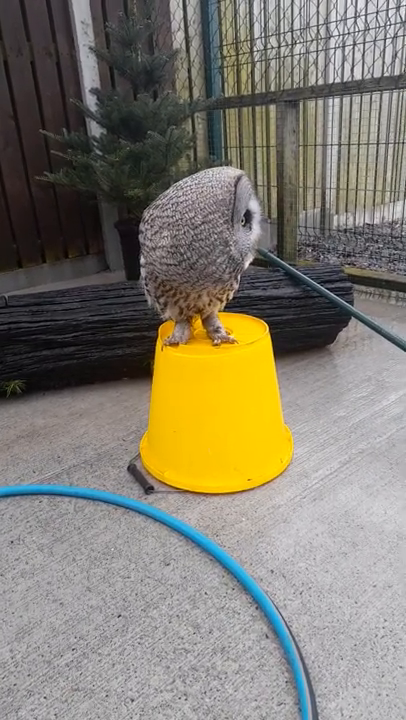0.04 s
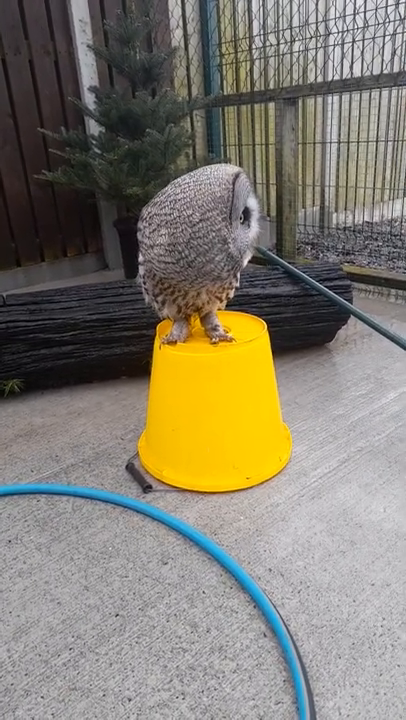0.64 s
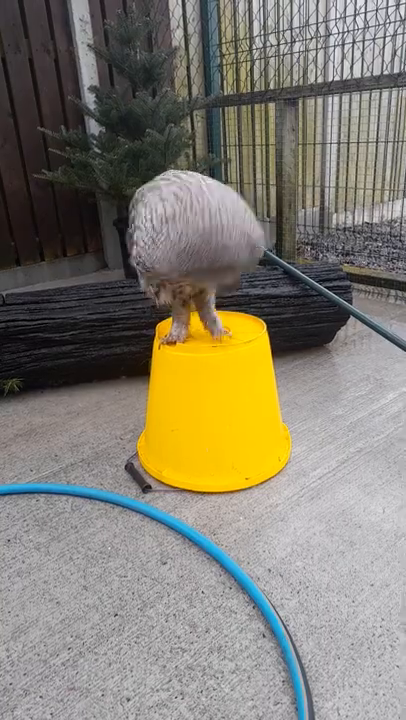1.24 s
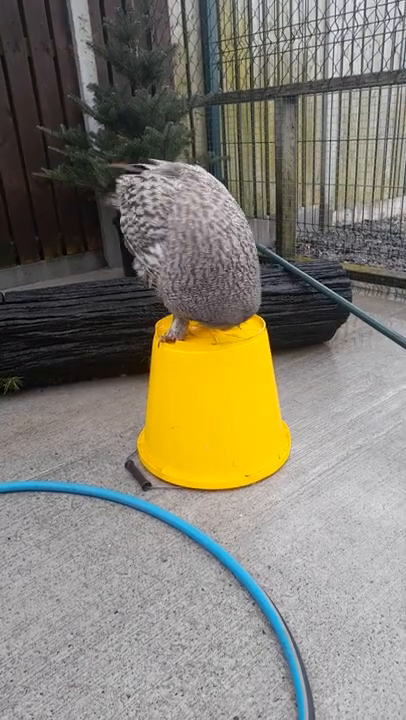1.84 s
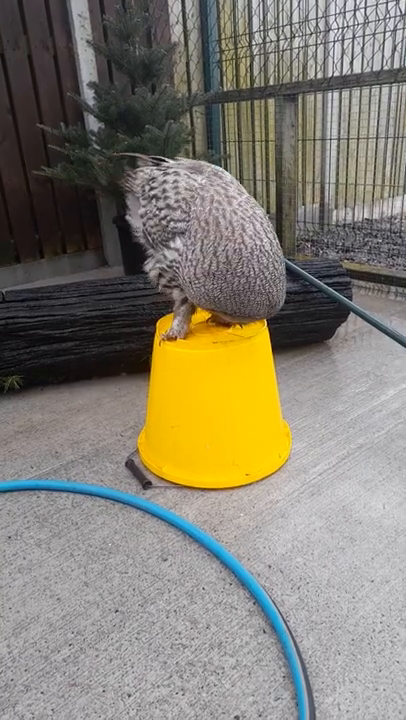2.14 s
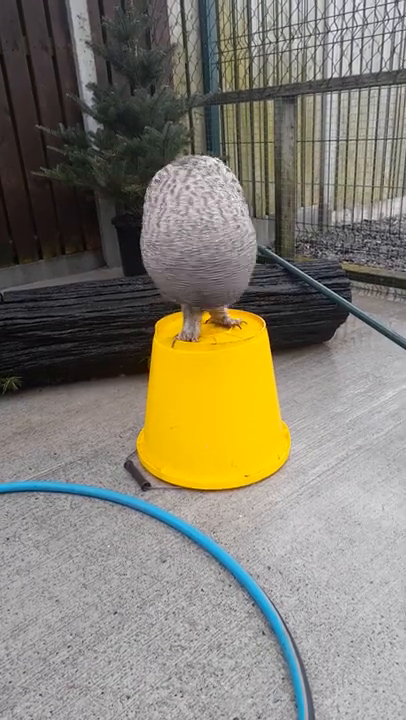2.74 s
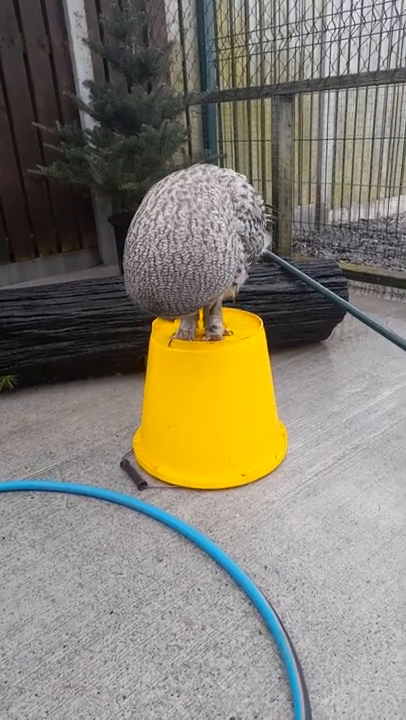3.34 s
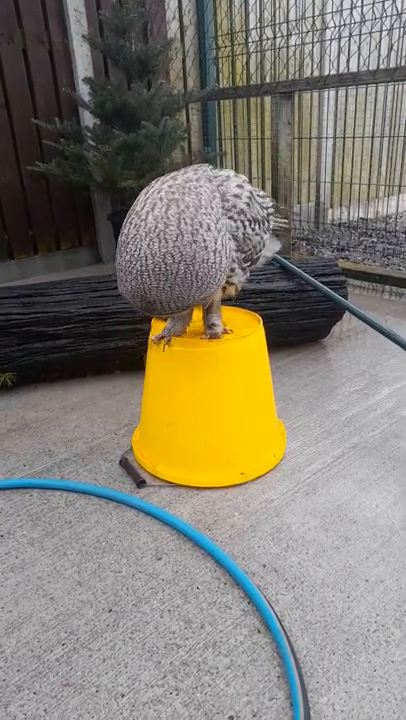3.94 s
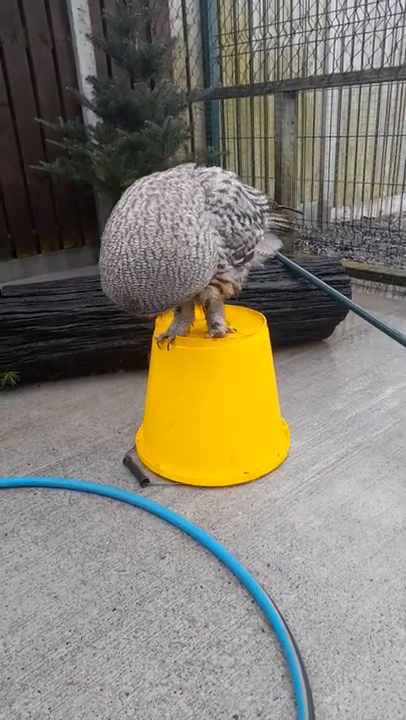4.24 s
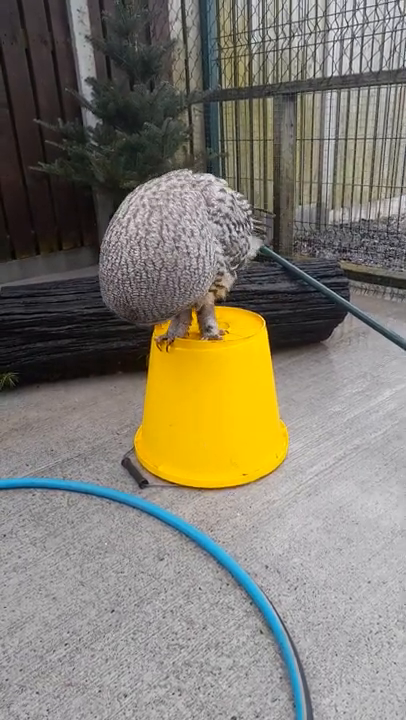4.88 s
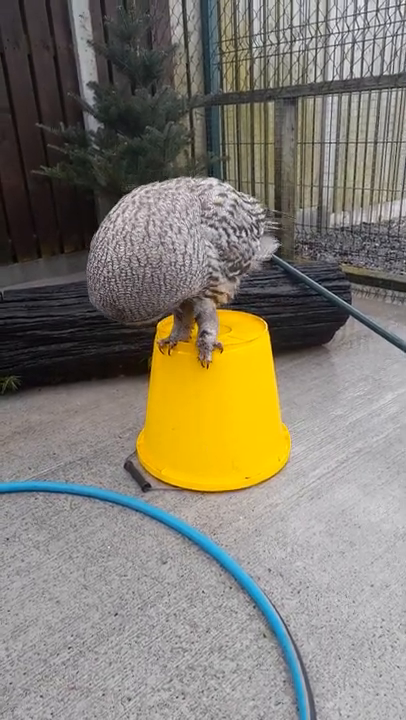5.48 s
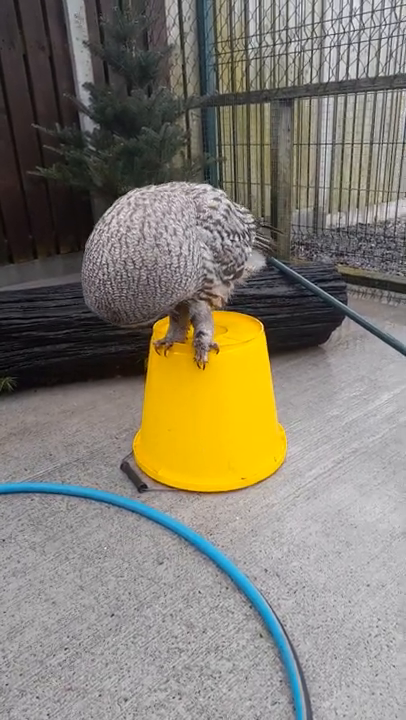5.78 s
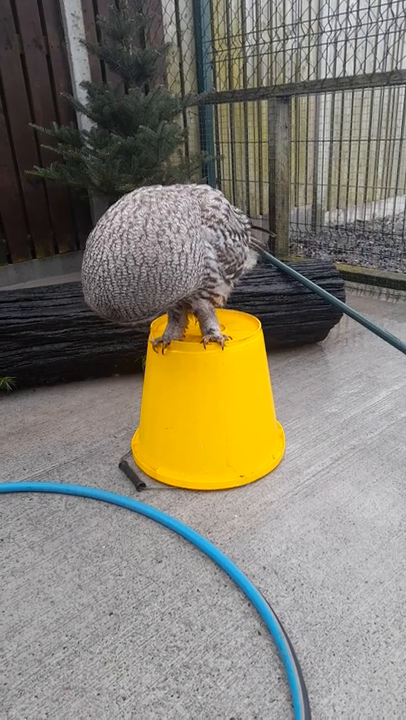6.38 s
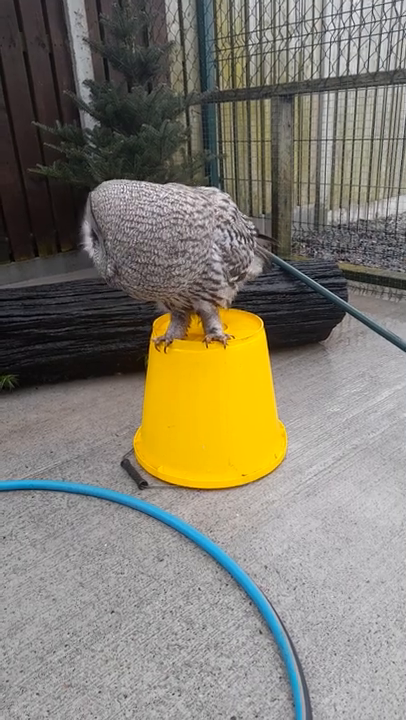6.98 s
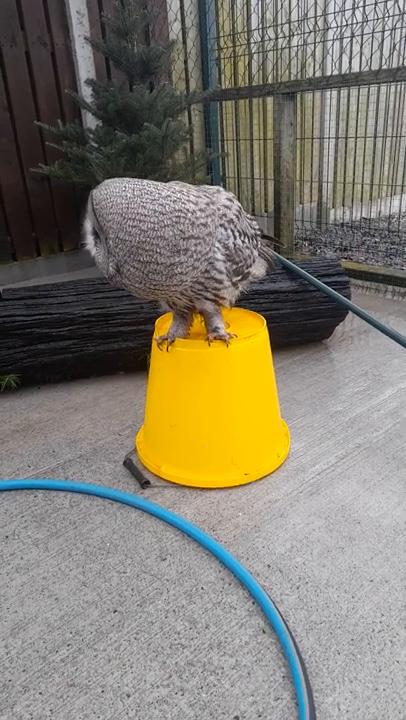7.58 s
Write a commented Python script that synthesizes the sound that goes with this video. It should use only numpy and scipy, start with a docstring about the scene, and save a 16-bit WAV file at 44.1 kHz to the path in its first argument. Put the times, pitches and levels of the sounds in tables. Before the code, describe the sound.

Sharp claw taps and hollow knocks sound on a plastic bucket under a stepping owl, with light gusts and faint rustling outdoors.

```python
"""Owl on a bucket

An owl shuffles round on an upturned plastic bucket in a walled yard, feathers rustling. The base knocks
softly as a foot lifts; talons then click on the plastic and the foot thumps it like a drum. Walls throw
each step back. A breeze buffets the microphone and stirs the leaves over a far rumble. Near the end
come a faint short tick and faint far calls."""
import sys
import numpy as np
from scipy import signal
from scipy.fft import rfft, irfft
from scipy.io import wavfile
from scipy.ndimage import uniform_filter1d

SR = 44100
rng = np.random.default_rng(int(sys.argv[2]) if len(sys.argv) > 2 else 0)


def inscribe(sig):
    """Save sig as 16-bit PCM at rate SR to the path in sys.argv[1].

    A 1-D sig is mono; a 2-D sig holds one channel per row.
    Samples are clipped to [-1, 1] before scaling.
    """
    pcm = np.round(np.clip(np.atleast_2d(sig).T, -1, 1) * 32767)
    wavfile.write(sys.argv[1], SR, pcm.astype(np.int16))


N = 335844

# A foot lands, one talon and then the next: start_s, level_db, tilt_db_per_octave, body_db, bite_db,
# next_gap_s, next_relative_db, ring_relative_db, upper_ring_db
FOOTFALLS = [(1.3645, -3, 0.25, 6.5, 1.5, .018, -0.5, -37.5, -6),
             (1.8732, -2.5, 0.9, 10.5, 2, 0.0083, 2.5, -30.5, -5),
             (2.4937, -8, 0, 4, 3, 0.0091, 1.5, -43, 7), (2.9424, -2.5, -1.4, 1, -1.5, 0.007, 0.5, -36, 8),
             (3.4774, -3, -0.9, -1, -4, .017, -5, -30.5, 7), (3.963, -9, -0.5, 5, 3, 0.011, -8, -42, 8),
             (4.4642, -3, -1.94, -4, -4.5, .012, -14, -25, 0),
             (5.1776, -12, -4, -6, 6, 0.011, -13, -51, -2), (6.0033, -8, -1.2, -3, 1, 0.012, -13, -36, 3)]
# A toe brushes the plastic: start_s, level_db, tilt_db_per_octave, body_db
TOE_SCUFFS = [(1.815, -27, -1.5, 12), (1.894, 0.5, -11, 4), (1.911, -8, -12, -1),
              (2.476, -11.5, -7.5, -4.5), (2.9382, 5, -13.5, -26), (3.025, -15, -5, 7),
              (3.403, -14, -8.5, -19), (3.425, -15.5, -6.5, -6), (3.472, 6, -17.5, -19.5),
              (4.088, -18, -14, -5), (4.449, -1, -20, -15), (4.456, 1, -19, -11),
              (4.537, -17.5, -3.5, 14.5), (5.07, -16, -10, -15), (5.922, -18, -8.5, -16)]
# The base springs back as a foot lifts: start_s, level_db
FOOT_LIFTS = [(1.297, -41.5), (1.828, -36), (4.366, -37), (5.028, -39.5), (5.860, -47)]
# Tone of a talon on plastic: frequency_hz, level_db
CLICK_SPECTRUM = [(100, -16.5), (300, 7.5), (500, -3), (900, -1.5), (1500, 1), (1950, 0), (2550, 0.5),
                  (3100, 1), (3700, 1), (5800, 2.5), (7500, -1), (10500, 1.5), (13500, -3.5), (16000, -13)]
# Stereo lean of the click: frequency_hz, left_minus_right_db
CLICK_BALANCE = [(700, -1), (1300, -3), (2400, -4), (4400, 2), (8000, 0), (14000, 6)]
# Upper resonances of the thin plastic: centre_hz, width_hz, boost_db
SHELL_RESONANCES = [(2296, 15, 9.5), (2540, 73, 5), (2507, 48, 4), (2782, 85, 6.5), (3250, 25, 4.5),
                    (3946, 25, 11), (5300, 90, 1.5), (5900, 140, 1.5)]
# The bucket's ringing modes: pitch_hz, level_db, t60_s
BUCKET_MODES = [(295, 1.5, 0.069), (468, -12.5, 0.16), (540, -3, 0.11), (634, -9.5, 0.29), (733.7, 2, 0.17),
                (988, 1.5, 0.093), (1160, -6, 0.041), (1254, -8, 0.19), (1430, -5, 0.11),
                (1464, -14.5, 0.27), (1591, 5.5, 0.059), (1700, -20, 0.068), (1766, -16, 0.15),
                (2370, -18, 0.14), (2590, -8, 0.031)]
# The owl's weight lands on the base: start_s, level_db, pitch_hz, rise_s, overtone_db
BASE_THUMPS = [(1.274, -35.5, 133, 0.016, -19), (1.367, -18, 144.5, 0.014, -19),
               (1.812, -40.5, 139, 0.028, -13), (1.881, -17.5, 123, 0.015, -6),
               (2.501, -30, 157.4, 0.0081, -12.5), (2.944, -26.5, 154, 0.0068, -15),
               (3.019, -26.5, 131, 0.0083, -12.5), (3.968, -38, 153, 0.0098, -7.5),
               (4.467, -33, 140, 0.011, -12), (4.487, -26.5, 132, 0.012, -16.5),
               (4.529, -24, 138, 0.0086, -10.5), (5.177, -38, 121, 0.0078, -7),
               (5.362, -37.5, 114, 0.014, -7.5), (5.999, -40, 139.6, 0.02, -8),
               (6.040, -37, 128, 0.0061, -9)]
# Fine high rustle of the owl's feathers: frequency_hz, level_db
FEATHER_SPECTRUM = [(6000, -12), (8500, -9.5), (9600, 1), (12000, -5), (14300, -6), (15000, -13),
                    (16000, -38)]
# Level rides for the hiss of leaves and the owl's feathers as it moves: time_s, leaves_db, feathers_db
LEAF_AND_FEATHER_LEVELS = [(0.0, -79, -78.5), (0.87, -82.5, -84), (1.55, -79, -81.5), (2.39, -78, -76.5),
                           (2.67, -72.5, -69.5), (2.95, -73.5, -73), (3.16, -79, -78), (4.54, -76, -72),
                           (4.71, -81.5, -76.5), (5.18, -79, -76), (5.53, -84.5, -81), (6.17, -80.5, -74.5),
                           (7.23, -88.5, -80.5), (7.62, -82.5, -78)]

# Reverb time of the yard: frequency_hz, t60_s
YARD_DECAY = [(150, 0.21), (550, 0.34), (1400, 0.24), (3700, 0.24), (9700, 0.22), (15000, 0.2)]
# How alike left and right are: frequency_hz, correlation
STEREO_LIKENESS = [(100, 1), (300, 0.97), (700, 0.44), (1400, 0), (3000, 0.023), (15000, 0)]

# Tone of wind on the microphone: frequency_hz, level_db
WIND_SPECTRUM = [(20, -37), (40, 0), (60, 5), (130, 3), (190, -6.5), (270, -18), (400, -24), (700, -37.5),
                 (1500, -60), (6000, -85)]
# Gusts at its two ports: start_s, length_s, left_db, right_db
WIND_GUSTS = [(0.0, 0.17, -31.5, -41.5), (0.261, 0.071, -30.5, -48), (0.415, 0.063, -35, -58),
              (0.583, 0.074, -38.5, -47), (0.644, 0.048, -28.5, -30), (0.744, 0.029, -38, -26.5),
              (1.011, 0.052, -30, -63), (1.134, 0.038, -32.5, -49), (2.283, 0.11, -46.5, -57),
              (2.375, 0.056, -31, -48), (2.524, 0.099, -43.5, -49), (3.388, 0.055, -39.5, -61),
              (3.473, 0.032, -30.5, -37.5), (3.66, 0.02, -36, -46), (3.83, .04, -46, -59),
              (4.048, 0.081, -43, -66), (4.136, 0.12, -35, -66), (4.296, .07, -36.5, -57),
              (4.904, 0.14, -43, -54), (6.223, 0.19, -51, -62), (6.424, 0.15, -38.5, -62),
              (6.678, 0.047, -47.5, -36.5), (6.767, 0.086, -56, -52.5)]
# The draught between gusts: left_db, right_db
DRAUGHT_DB = [-75.5, -66.5]
# Single eddies slap a port: centre_s, level_db, pitch_hz, right_share
WIND_EDDIES = [(0.182, -18.5, 158, 0), (0.227, -24.5, 190, 0), (.662, -17, 185, 0.97),
               (0.676, -13.5, 141, 0.4), (.743, -24.5, 223, 0.94), (0.769, -16.5, 276, 1),
               (1.089, -23.5, 172, 0.09), (1.184, -24, 231, 0.07), (4.36, -21, 127, 0),
               (6.375, -31, 123, 0.95), (6.71, -22.5, 188, 0.93)]
# Hiss of the leaves: frequency_hz, level_db
LEAF_SPECTRUM = [(1200, -24), (2050, -8.5), (2650, 3), (3350, -7), (4500, 1.5), (7400, -9), (9000, -10),
                 (14000, -13.5), (15500, -30)]
# Tone of the far rumble: frequency_hz, level_db
RUMBLE_SPECTRUM = [(20, -41), (45, 0), (130, -1), (250, -5.5), (360, -15.5), (500, -13), (640, -15.5),
                   (900, -13.5), (1200, -19), (1480, -22), (1900, -33), (2700, -36.5), (5000, -51.5),
                   (16000, -46)]
# Its slow rise and fall: time_s, level_db
RUMBLE_LEVELS = [(0.0, -65), (0.49, -67.5), (4.54, -69), (4.77, -72), (5.24, -66.5), (5.64, -72.5),
                 (6.6, -66.5), (7.62, -71)]
# A faint short tick near 1 kHz, then faint far calls: start_s, length_s, start_hz, end_hz, level_db
TICK_AND_CALLS = [(6.203, 0.021, 965, 1015, -56), (7.3, 0.22, 2250, 1960, -82),
                  (7.326, 0.28, 1510, 1443, -75)]

NEXT_TILT_DB_PER_OCTAVE, NEXT_BODY_DB = -2.06, -3.5  # the next talon is duller and thinner
BITE_HZ, BITE_WIDTH_HZ = 2780, 750  # the plastic's hollow band; its level depends on where a talon lands
SCUFF_RING_DB = -31.5  # bucket ring relative to a scuff
PRESS_RING, PRESS_UPPER = 0.8, -0.45  # a harder toe rings louder and darker: dB per dB of body
PEEL_DB, PEEL_TILT_DB_PER_OCTAVE, PEEL_BODY_DB = 23, -12.5, 6  # the sole peels off as a foot lifts
UPPER_RING_HZ, LIFT_UPPER_DB = 850, -2.5  # where the upper ring begins; its trim on a lift


def talons(level_db=-13, chatter_s=0.008, chatter_db=5.5, ripple_db=2.5, bounce_db=-4):
    """Talon on plastic: a hard tick and a few ms of chatter in the crowded upper modes."""
    out, hz, t = np.zeros((2, N)), np.fft.rfftfreq(4096, 1 / SR), np.arange(1024) / SR
    ripple = unit_rms(uniform_filter1d(rng.standard_normal(len(hz)), size=8))  # one shell for every tap
    shell_db = curve_at(CLICK_SPECTRUM, hz) + ripple_db * ripple * hz / (hz + 2000)
    shell_db += sum(bell_eq(hz, *resonance) for resonance in SHELL_RESONANCES)
    side_db = curve_at(CLICK_BALANCE, hz) / 2
    treble_octaves = np.log2(np.maximum(hz / 1500, 1))
    for start_s, db, tilt, body_db, bite_db, _, _ in foot_contacts():
        tone_db = shell_db + tilt * treble_octaves
        tone_db += body_db / (1 + (hz / 750) ** 4)  # low shelf
        tone_db += bell_eq(hz, BITE_HZ, BITE_WIDTH_HZ, bite_db)
        tick = np.array([minimum_phase(tone_db + side_db), minimum_phase(tone_db - side_db)])
        chatter = stereo_noise([(20, 0), (20000, 0)], size=1024, likeness=0.88) * np.exp(-t / chatter_s)
        path = yard_reverb(wet_db=7, build_s=0.0047)
        path[:, :len(t)] += gain_of(chatter_db) * chatter / np.linalg.norm(chatter[0])
        for channel in path:  # ground and near timber send back distinct copies
            channel[rng.integers(80, 900, size=2)] += gain_of(bounce_db)
        path[:, 0] -= 0.4  # the plastic takes the edge off the first tick
        add(out, start_s, gain_of(db + level_db) * signal.fftconvolve(tick, path, axes=1))
    return out


def bucket_knocks(level_db=-13, rise_s=0.0019):
    """Each touch rings the bucket; where the foot presses sets how much each mode speaks."""
    out, t = np.zeros((2, N)), np.arange(12000) / SR
    hz, mode_db, t60_s = np.transpose(BUCKET_MODES)[:, :, None]
    for start_s, *_, ring_db, upper_db in foot_contacts():
        strike_db = mode_db + upper_db * (hz > UPPER_RING_HZ) + rng.standard_normal(hz.shape)
        modes = np.sin(2 * np.pi * (hz * t + rng.random(hz.shape)))
        ring = (gain_of(strike_db - 60 * t / t60_s) * modes).sum(0)
        ring *= 1 - np.exp(-t / rise_s)
        add(out, start_s, gain_of(ring_db + level_db) * in_yard(ring, wet_db=-9, build_s=0.0051))
    return out


def foot_contacts():
    """Every touch: start_s, click_db, tilt_db_per_octave, body_db, bite_db, ring_db, upper_ring_db."""
    for start_s, db, tilt, body_db, bite_db, gap_s, next_db, ring_db, upper_db in FOOTFALLS:
        yield start_s, db, tilt, body_db, bite_db, db + ring_db, upper_db
        yield (start_s + gap_s, db + next_db, tilt + NEXT_TILT_DB_PER_OCTAVE, body_db + NEXT_BODY_DB,
               bite_db, db + next_db + ring_db, upper_db)
    for start_s, db, tilt, body_db in TOE_SCUFFS:
        ring_db = db + SCUFF_RING_DB + PRESS_RING * body_db
        yield start_s, db, tilt, body_db, 0, ring_db, PRESS_UPPER * body_db
    for start_s, db in FOOT_LIFTS:
        yield start_s, db + PEEL_DB, PEEL_TILT_DB_PER_OCTAVE, PEEL_BODY_DB, 0, db, LIFT_UPPER_DB


def base_thumps(echo_s=0.084, echo_db=-22, overtone_ratio=1.508):
    """The base swings like a drumhead as the weight settles; a wall slaps the boom back."""
    out, t = np.zeros((2, N)), np.arange(10000) / SR
    for start_s, db, hz, rise_s, overtone_db in BASE_THUMPS:
        swell = (t / rise_s * np.exp(1 - t / rise_s)) ** 2
        phase = 2 * np.pi * hz * t
        swing = np.sin(phase) + gain_of(overtone_db) * np.sin(overtone_ratio * phase)
        boom = gain_of(db) * in_yard(swell * swing, wet_db=-4.5, build_s=0.0079)
        add(out, start_s, boom)
        add(out, start_s + echo_s, gain_of(echo_db) * boom)
    return out


def feathers(trim_db=2):
    """The fine high rustle of the owl's feathers as it moves."""
    time_s, _, db = np.transpose(LEAF_AND_FEATHER_LEVELS)
    return fader(time_s, db + trim_db) * stereo_noise(FEATHER_SPECTRUM, size=N, likeness=0)


def wind(level_db=-1, eddy_db=-1):
    """Turbulence buffets each microphone port separately; eddies add single swings of pressure."""
    out = gain_of(level_db) * stereo_noise(WIND_SPECTRUM, size=N, likeness=0) * gust_envelope()
    t = np.arange(-700, 700) / SR
    for centre_s, db, hz, right_share in WIND_EDDIES:
        phase = 2 * np.pi * hz * t
        swing = np.sin(phase) / np.cosh(phase * 0.49)
        add(out, centre_s + t[0], gain_of(db + eddy_db) * np.outer([1 - right_share, right_share], swing))
    return out


def gust_envelope(attack_s=0.018, release_s=0.046):
    """Wind strength, left and right: each gust swells, holds and dies away over a faint draught."""
    t = np.arange(N) / SR
    power = np.outer(gain_of(DRAUGHT_DB) ** 2, np.ones(N))
    for start_s, length_s, left_db, right_db in WIND_GUSTS:
        attack = np.clip((t - start_s) / attack_s, 0, 1)
        release = np.exp(-np.maximum(t - start_s - length_s, 0) / release_s)
        power += np.outer(gain_of([left_db, right_db]), attack * release) ** 2
    return np.sqrt(power)


def leaves(trim_db=3):
    """Leaves stir in the breeze with a wide hiss."""
    time_s, db, _ = np.transpose(LEAF_AND_FEATHER_LEVELS)
    return fader(time_s, db + trim_db) * stereo_noise(LEAF_SPECTRUM, size=N, likeness=0)


def far_rumble(trim_db=10):
    """A low outdoor bed that drifts in level."""
    time_s, db = np.transpose(RUMBLE_LEVELS)
    return fader(time_s, db + trim_db) * stereo_noise(RUMBLE_SPECTRUM, size=N, likeness=0.83)


def tick_and_far_calls(waver_depth=0.084):
    """A faint short tick, then far wavering calls, all heard mostly by reflection."""
    out = np.zeros((2, N))
    for start_s, length_s, start_hz, end_hz, db in TICK_AND_CALLS:
        size = round(length_s * SR)
        waver = unit_rms(uniform_filter1d(rng.standard_normal(size), size=120))
        hz = np.linspace(start_hz, end_hz, size) * (1 + waver_depth * waver)
        tone = np.sin(2 * np.pi * np.cumsum(hz) / SR) * np.hanning(size)
        add(out, start_s, gain_of(db) * in_yard(tone, wet_db=3, build_s=0.01))
    return out


def yard_reverb(wet_db, build_s):
    """A direct path, then scatter from ground, fence and walls that dies band by band."""
    scatter = stereo_noise([(20, 0), (20000, 0.016)], size=16384, likeness=0.99)
    hz, t, bands = signal.stft(scatter, SR, nperseg=256)
    decay = gain_of(-60 * t / curve_at(YARD_DECAY, hz)[:, None])
    response = signal.istft(bands * decay, SR, nperseg=256)[1]
    response *= 1 - np.exp(-np.arange(response.shape[1]) / SR / build_s)
    response *= gain_of(wet_db) / np.linalg.norm(response[0])
    response[:, 0] += 1  # direct path
    return response


def in_yard(mono, wet_db, build_s):
    """Plays a mono sound through the yard's stereo reverb."""
    return signal.fftconvolve(mono[None], yard_reverb(wet_db, build_s), axes=1)


def stereo_noise(spectrum, size, likeness):
    """Coloured noise; likeness pulls the bass to the centre and leaves the treble wide."""
    hz = np.fft.rfftfreq(size, 1 / SR)
    left, unrelated = rfft(rng.standard_normal((2, size)))
    shared = np.clip(curve_at(STEREO_LIKENESS, hz) * likeness, -1, 1)
    right = shared * left + np.sqrt(1 - shared ** 2) * unrelated
    return unit_rms(irfft(np.array([left, right]) * gain_of(curve_at(spectrum, hz)), size))


def minimum_phase(db):
    """The tightest impulse that has this gain per frequency bin."""
    log_gain = np.log(gain_of(np.concatenate([db, db[-2:0:-1]])))
    return np.fft.ifft(np.exp(signal.hilbert(log_gain).conj())).real


def bell_eq(hz, centre_hz, width_hz, boost_db):
    """A bell-shaped boost or cut, in dB."""
    return boost_db / (1 + (2 * (hz - centre_hz) / width_hz) ** 2)


def curve_at(points, hz):
    """Reads a table along a log-frequency axis."""
    point_hz, values = np.transpose(points)
    return np.interp(np.log(hz + 1), np.log(point_hz + 1), values)


def fader(time_s, db):
    """A level ride as a gain for every sample."""
    return gain_of(np.interp(np.arange(N) / SR, time_s, db))


def gain_of(db):
    """Decibels to amplitude."""
    return 10 ** (np.asarray(db) / 20)


def unit_rms(x):
    """Scales to rms 1."""
    return x / np.sqrt(np.mean(x ** 2) + 1e-20)


def add(mix, start_s, sound):
    """Drops a stereo sound into the mix."""
    part = mix[:, round(start_s * SR):][:, :sound.shape[1]]
    part += sound[:, :part.shape[1]]


def scene():
    """The owl's steps in the breezy yard."""
    steps = talons() + bucket_knocks() + base_thumps()
    return steps + wind() + far_rumble() + leaves() + feathers() + tick_and_far_calls()


def record(dry, cutoff_hz=15950):
    """A quick fade-in and a steep high cut."""
    fade_in = np.minimum(np.arange(N) / 200, 1)
    high_cut = signal.firwin(511, cutoff_hz, window=("kaiser", 9), fs=SR)
    return signal.oaconvolve(dry * fade_in, high_cut[None], "same")


dry = scene()
out = record(dry)
inscribe(out)
```